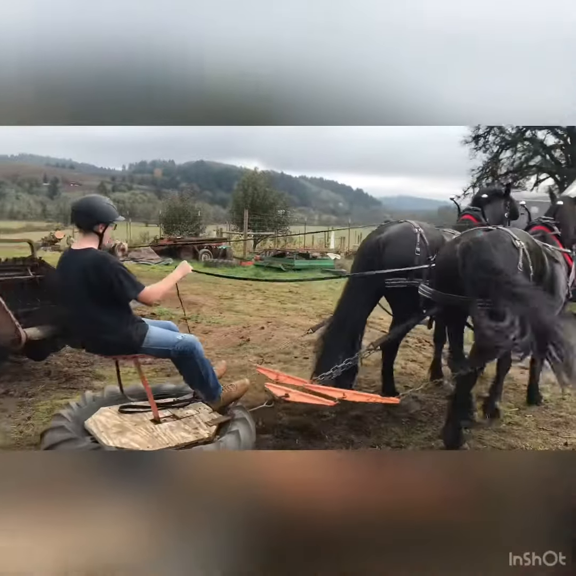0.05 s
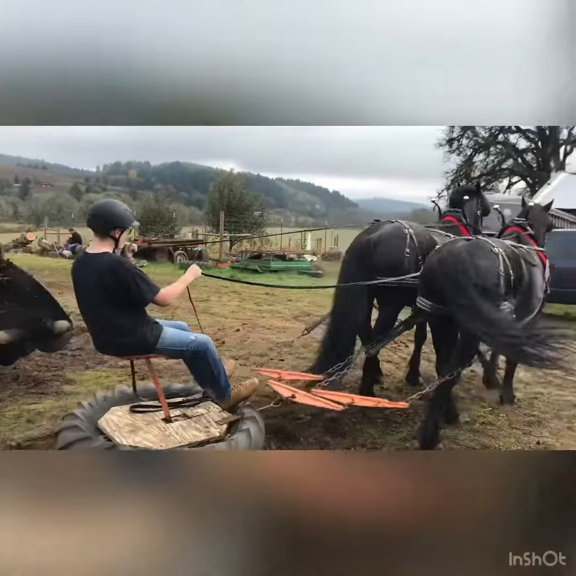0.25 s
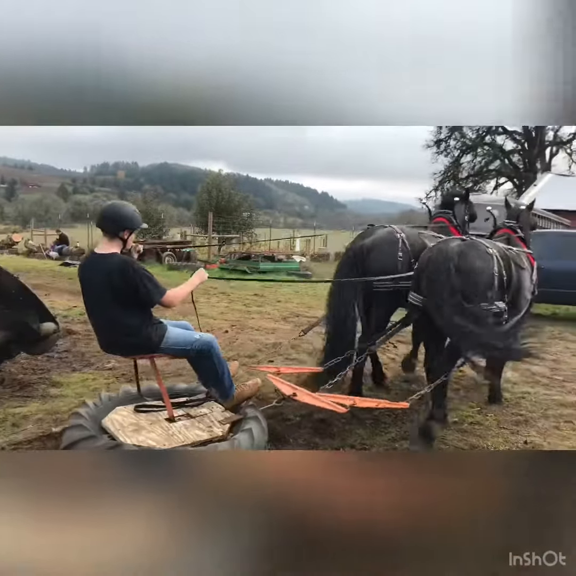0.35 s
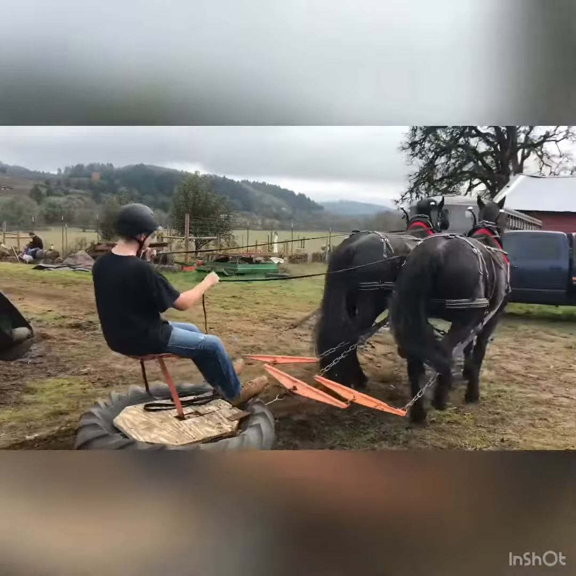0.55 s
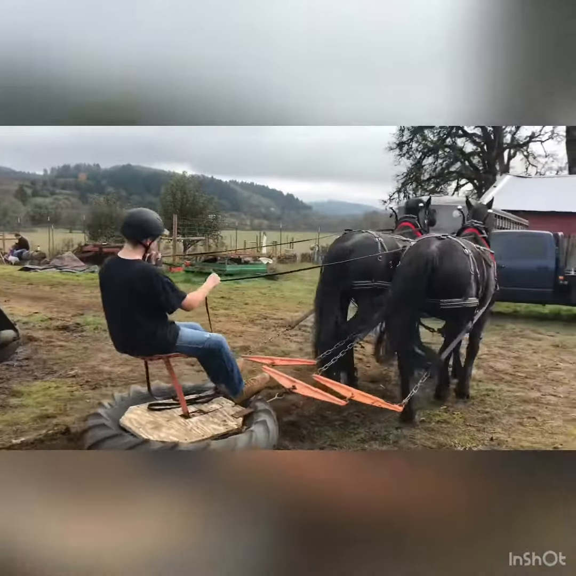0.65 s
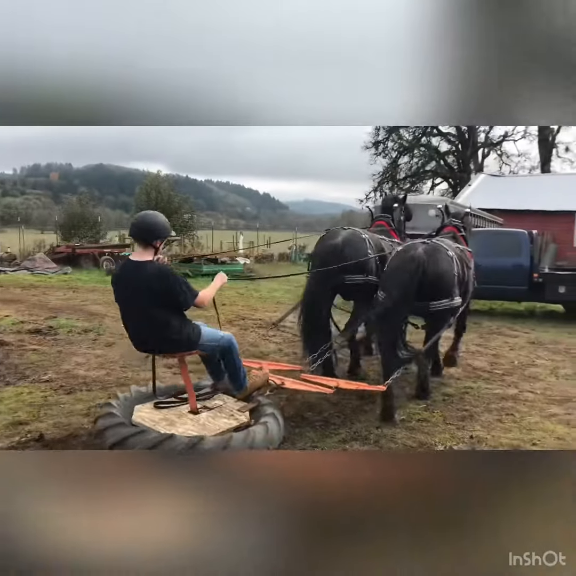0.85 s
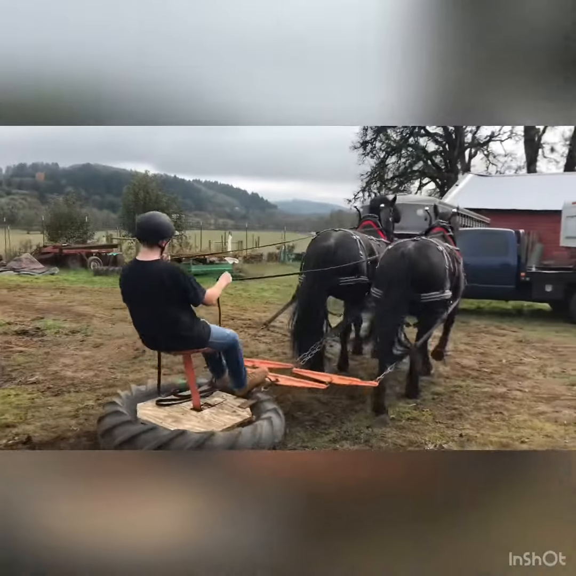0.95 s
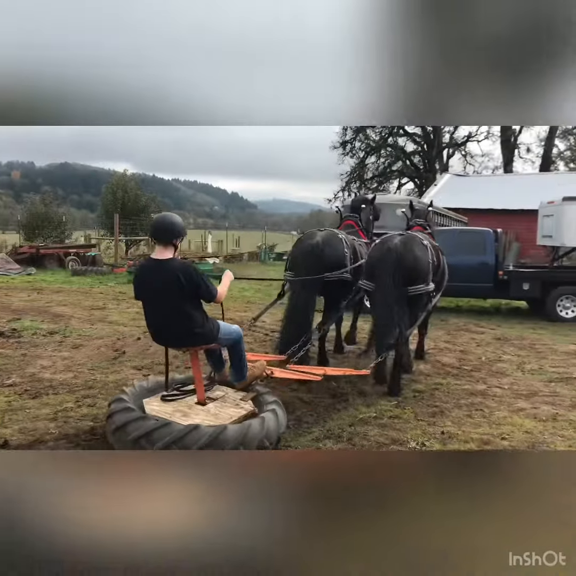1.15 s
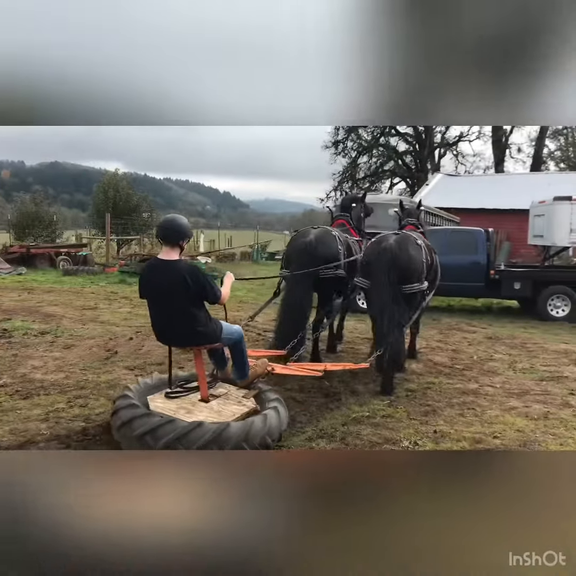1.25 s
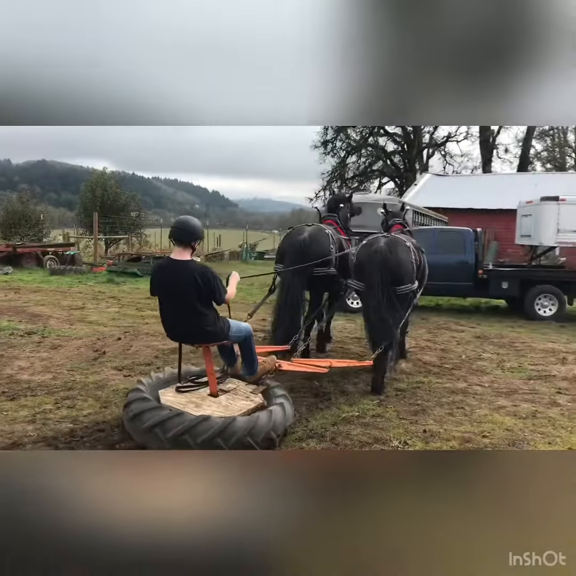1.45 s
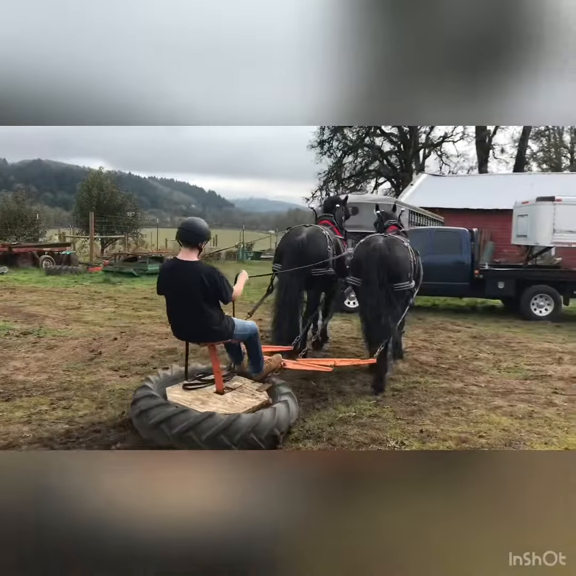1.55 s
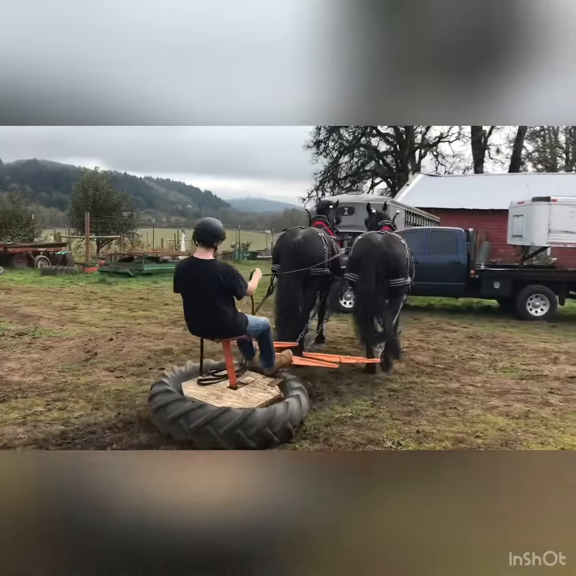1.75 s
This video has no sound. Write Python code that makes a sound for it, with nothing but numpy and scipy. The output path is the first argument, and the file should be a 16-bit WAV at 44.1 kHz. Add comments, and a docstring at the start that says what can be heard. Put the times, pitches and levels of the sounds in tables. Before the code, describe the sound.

A steel hitch clanks twice over a dragged tyre's low rumble and soft hoof thuds.

```python
"""A farmyard, where draft horses drag a tyre sled. The steel hitch clanks twice, each time with a rebound:
impact excites its modes, which decay until the first rebound chokes the earlier ring, and a small link rings
after the second clank. Beneath are one deep bump, soft hoof thuds, scuffed dirt and ticks of snapping straw and
grit. Sliding friction gives the tyre its low rumble and rustle. A few faint high chirps, perhaps a far bird,
sit in a faint hiss of outdoor air."""
import sys
import numpy as np
from scipy import signal
from scipy.fft import rfft, irfft, next_fast_len
from scipy.io import wavfile
from scipy.ndimage import map_coordinates

SR = 44100
rng = np.random.default_rng(int(sys.argv[2]) if len(sys.argv) > 2 else 0)


def store_pcm(level_fs):
    """Save levels as 16-bit WAV."""
    pcm = np.round(np.clip(level_fs, -1, 1) * 32767).astype(np.int16)
    wavfile.write(sys.argv[1], SR, np.atleast_2d(pcm).T)


N = 79380
T = np.arange(N) / SR


def amp(db):
    """Amplitude ratio of a level in decibels."""
    return 10 ** (np.asarray(db) / 20)


def unit_rms(x):
    """Normalisation to an rms of 1."""
    return x / np.sqrt(np.mean(x ** 2) + 1e-20)


def along(points, hz):
    """Interpolation of (frequency, value) points on a logarithmic frequency axis."""
    freqs, values = np.transpose(points)
    return np.interp(np.log(hz + 1), np.log(freqs + 1), values)


def filtered(x, response):
    """Linear filtering: the spectrum of x times a frequency response."""
    size = next_fast_len(N + SR // 2)
    return irfft(rfft(x, size) * response(np.fft.rfftfreq(size, 1 / SR)), size)[:N]


def noise(spectrum, tilt=0):
    """Spectral shaping of white noise, with a tilt in dB per octave, to an rms of 1."""
    white = rng.standard_normal(N)
    return unit_rms(filtered(white, lambda hz: amp(along(spectrum, hz) + tilt * np.log2(hz + 1))))


def wobble(knots_per_s):
    """Random modulation: a spline through Gaussian values."""
    knots = rng.standard_normal(int(N * knots_per_s / SR) + 4)
    return map_coordinates(knots, [T * knots_per_s])


def since(onset):
    """Time elapsed from the onset, zero before it."""
    return np.maximum(T - onset, 0)


def fade(t, rise, t60):
    """Exponential decay, 60 dB in t60 seconds, with a quick rise."""
    return (1 - np.exp(-t / rise)) * np.exp(-np.log(1000) * t / t60)


def swell(onset, length):
    """A smooth envelope that peaks at 1, half a length after the onset."""
    u = 2 * since(onset) / length
    return (u * np.exp(1 - u)) ** 2


# Blows on the hitch (time [s], ring level [dB], ring tilt [dB/octave], damping of earlier ring [dB],
# clatter level [dB], clatter tilt [dB/octave], crack level [dB], crack tilt [dB/octave], spot [0 or 1])
BLOWS = [(0.2088, -14.5, 0, 0, -21, 0.3, -4, 1, 0), (0.2438, -24.5, 0.7, -18, -23, 0.7, -4, -3, 0),
         (1.4228, -27.5, 0.7, 0, -36, -0.7, -18.5, 6, 1), (1.4470, -41, 2, 0, -39, -1, -26, 1, 1)]
# Modes of the steel (frequency [Hz], T60 [s], gain struck at spot 0 [dB], gain struck at spot 1 [dB])
STEEL_MODES = [(540, .3, -18, -27), (926, .3, -19, -24), (1114, .35, -9.5, -2.5), (1163, .18, -13, -20),
               (1556, .14, -15, -11), (1674, .17, -11, -17), (1829, .37, -3.5, -14), (1869, .24, -17, -17),
               (2011, .14, -15, -12), (2155, .135, 2, 0), (2560, .45, -27, -26), (2632, .17, -9, -20),
               (2760, .24, -22, -13), (3033, .16, -1, -17), (3261, .23, -14, -11), (3417, .11, -15, -5),
               (3708, .2, -16, -28), (3827, .12, -9, -20), (4046, .33, -28, -17), (4271, .25, -11, -17),
               (4471, .19, -18, -28), (5210, .1, -18, -36), (6025, .12, -28, -18)]
# Heavily damped modes of the contact (frequency [Hz], T60 [s], gain [dB])
CRACK_MODES = [(1150, 0.0075, -9), (1890, 0.0099, -0.5), (3230, 0.015, -6), (6490, 0.019, -32)]


def hitch():
    """Modal superposition: each blow cracks, rattles and rings; the spot struck weights the modes."""
    pivot_hz, choke_s = 2000, .001
    ring, knocks = np.zeros(N), np.zeros(N)
    for onset, ring_db, ring_tilt, damping_db, links_db, links_tilt, crack_db, crack_tilt, spot in BLOWS:
        t = since(onset)
        ring *= amp(damping_db * (1 - np.exp(-t / choke_s)))  # renewed contact can choke the ring
        for hz, t60, *spot_db in STEEL_MODES:
            level = ring_db + spot_db[spot] + ring_tilt * np.log2(hz / pivot_hz)
            mode = np.sin(2 * np.pi * (hz * t + rng.random()))
            ring += amp(level) * fade(t, rise=.00032, t60=t60) * mode
        for hz, t60, db in CRACK_MODES:
            level = crack_db + db + crack_tilt * np.log2(hz / pivot_hz)
            knocks += amp(level) * fade(t, rise=.00035, t60=t60) * np.sin(2 * np.pi * hz * t)
        knocks += amp(links_db) * link_clatter(onset, links_tilt)
    return ring + knocks


# Spectrum of the chain links (frequency [Hz], relative level [dB])
LINK_SPECTRUM = [(100, -38), (350, -22.5), (560, -8.5), (750, -8.5), (1100, -7), (1900, 0.5), (2450, -10.5),
                 (3150, -3.5), (4200, -7), (5000, -15.5), (6600, -13), (9000, -24.5), (11000, -33),
                 (16000, -42)]
# Decay time of the links (frequency [Hz], T60 [s])
LINK_DECAY = [(500, 0.29), (2000, 0.14), (4000, 0.13), (8000, 0.11), (15000, 0.14)]


def link_clatter(onset, tilt):
    """Modal overlap: the links' dense modes merge into noise, each band decaying at its own rate."""
    rise_s = .00071
    hz, frame_times, bands = signal.stft(noise(LINK_SPECTRUM, tilt), SR, nperseg=256)
    age = np.maximum(frame_times - onset, 0)
    decay = np.exp(-np.log(1000) * age / along(LINK_DECAY, hz)[:, None])
    rattle = signal.istft(bands * decay, SR, nperseg=256)[1][:N]
    t = since(onset)
    attack = 1 - np.exp(-t / rise_s)
    burst = amp(1) * fade(t, rise_s, t60=.024)  # the links rattle harder in the first instant
    return rattle * (attack + burst)


def link_ping():
    """Free vibration: a small link rings briefly in a single mode."""
    t, hz = since(1.561), 5320
    return amp(-47) * fade(t, rise=.008, t60=.17) * np.sin(2 * np.pi * hz * t)


# Tyre bumps and hoof falls (time [s], level [dB], frequency [Hz], rise time [s], T60 [s])
GROUND_IMPACTS = [(0.215, -39, 200, .006, .25), (0.445, -35, 135, .006, .08), (0.448, -37, 520, .002, .025),
                  (0.714, -32, 88, .012, .1), (0.735, -33, 320, .003, .025), (0.928, -38, 190, .004, .06),
                  (0.930, -8.5, 81, .018, .095), (1.347, -39, 420, .002, .025),
                  (1.349, -42, 950, .002, .02), (1.692, -35, 220, .003, .04), (1.70, -29, 72, .012, .13)]


def thuds():
    """Damped oscillation: each soft, heavy contact with the ground dies away quickly."""
    out = np.zeros(N)
    for onset, db, hz, rise, t60 in GROUND_IMPACTS:
        t = since(onset)
        attack = 1 - np.exp(-(t / rise) ** 2)
        decay = np.exp(-np.log(1000) * (t - rise) / t60)
        out += amp(db) * attack * decay * np.sin(2 * np.pi * hz * t)
    return out


# Spectra of the tyre's rumble and rustle (frequency [Hz], relative level [dB])
RUMBLE_SPECTRUM = [(20, -40), (35, -28), (48, -11), (62, 0), (78, -1), (100, -9), (130, -17), (200, -29),
                   (400, -58), (900, -90)]
RUSTLE_SPECTRUM = [(80, -15), (150, 2), (260, -3), (400, -8), (700, -11.5), (1000, -12), (2100, -18.5),
                   (3900, -19.5), (4900, -23.5), (7700, -29), (8700, -29), (15500, -42)]
# Low rumble, ducking briefly after the first clank like a recorder's gain control (time [s], level [dB])
RUMBLE_ENVELOPE = [(0, -40), (0.28, -41), (0.34, -48.5), (0.39, -46.5), (0.45, -42.5), (0.68, -38.5),
                   (1.05, -42.5), (1.15, -40.5), (1.6, -41), (1.8, -42)]


def tyre_drag():
    """Sliding friction: the tyre rumbles and rustles on the soil; the rustle fades as it moves away."""
    rustle_db, recede_db_per_s, roughness_db = -50.5, 2, 2.16
    rumble = noise(RUMBLE_SPECTRUM) * amp(np.interp(T, *np.transpose(RUMBLE_ENVELOPE)))
    rustle = noise(RUSTLE_SPECTRUM)
    rustle *= amp(rustle_db - recede_db_per_s * T + roughness_db * wobble(knots_per_s=40.11))
    return rumble + rustle


# Hooves scraping the dirt (time [s], length [s], earth level [dB], grit level [dB])
HOOF_SCUFFS = [(0.436, 0.034, -44.5, -50.5), (0.453, 0.05, -68, -53.5), (0.559, 0.019, -69, -48.5),
               (0.684, 0.053, -47, -49.5), (0.823, .035, -43, -51.5), (0.858, 0.018, -55, -54),
               (0.925, 0.02, -41.5, -82), (0.962, 0.032, -53, -56), (1.035, 0.047, -54, -67),
               (1.323, 0.052, -46, -52), (1.367, 0.01, -44, -47)]
# Spectra of earth and grit (frequency [Hz], relative level [dB])
EARTH_SPECTRUM = [(60, 0.5), (150, 7), (400, -4), (700, -16), (1500, -18.5), (3000, -24.5), (9000, -61)]
GRIT_SPECTRUM = [(300, 6), (1500, -0.5), (4000, 0), (7000, -9), (11000, -14.5), (16000, -13)]


def scuffs():
    """Friction noise: a hoof scrapes dull earth and grainy, randomly modulated grit."""
    roughness_db = 6.5
    out = np.zeros(N)
    for onset, length, earth_db, grit_db in HOOF_SCUFFS:
        grit = unit_rms(noise(GRIT_SPECTRUM) * amp(roughness_db * wobble(knots_per_s=500)))
        earth = noise(EARTH_SPECTRUM)
        out += swell(onset, length) * (amp(earth_db) * earth + amp(grit_db) * grit)
    return out


# Snaps of straw and grit (time [s], level [dB])
SNAPS = [(0.303, -42), (0.567, -44), (0.831, -43), (0.864, -45), (0.957, -48), (0.999, -48), (1.014, -40)]
# Spectrum of a snap (frequency [Hz], relative level [dB])
SNAP_SPECTRUM = [(1000, -17), (4000, -12), (7000, 8.5), (10000, 3), (16000, -8)]


def ticks():
    """Brittle fracture: snapping straw and grit radiate short, bright transients."""
    out = np.zeros(N)
    for onset, db in SNAPS:
        out += amp(db) * noise(SNAP_SPECTRUM) * fade(since(onset), rise=.00032, t60=.012)
    return out


# Faint, distant chirps (time [s], length [s], centre frequency [Hz], level [dB])
FAR_CHIRPS = [(0.568, .025, 4000, -55), (1.052, .02, 4400, -55), (1.112, .02, 4400, -60),
              (1.68, .018, 4350, -56), (1.745, .018, 4350, -54)]


def chirps():
    """Narrow-band noise: a Gaussian band gives each short peep a blurred pitch."""
    relative_width = .08
    out = np.zeros(N)
    for onset, length, hz, db in FAR_CHIRPS:
        white = rng.standard_normal(N)
        peep = unit_rms(filtered(white, lambda f: np.exp(-((f / hz - 1) / relative_width) ** 2)))
        out += amp(db) * swell(onset, length) * peep
    return out


# Spectrum of the outdoor air (frequency [Hz], relative level [dB])
AIR_SPECTRUM = [(1500, -31), (4000, -4.5), (6500, 2), (9400, 0.5), (10400, -5), (16000, -1.5)]
# Background hiss, ducking with the rumble after the first clank (time [s], level [dB])
AIR_ENVELOPE = [(0, -54.5), (0.2, -55.5), (0.34, -65), (0.5, -60.5), (0.85, -57), (1.1, -62.5), (1.4, -60),
                (1.55, -63.5), (1.8, -65.5)]


def outdoor_air():
    """Ambient noise floor: a faint hiss of outdoor air."""
    return noise(AIR_SPECTRUM) * amp(np.interp(T, *np.transpose(AIR_ENVELOPE)))


def scene():
    """Linear superposition: all sources add at one microphone."""
    events = hitch() + link_ping() + thuds() + scuffs() + ticks() + chirps()
    return (events + tyre_drag() + outdoor_air())[None]


def record(dry):
    """Band limiting: the recorder drops the deepest bass and the highest treble."""
    low_cut_hz, top_hz = 45., 15750
    band = lambda hz: (hz < top_hz) * hz ** 6 / np.sqrt(hz ** 12 + low_cut_hz ** 12)
    return np.array([filtered(channel, band) for channel in dry])


dry = scene()
out = record(dry)
store_pcm(out)
```